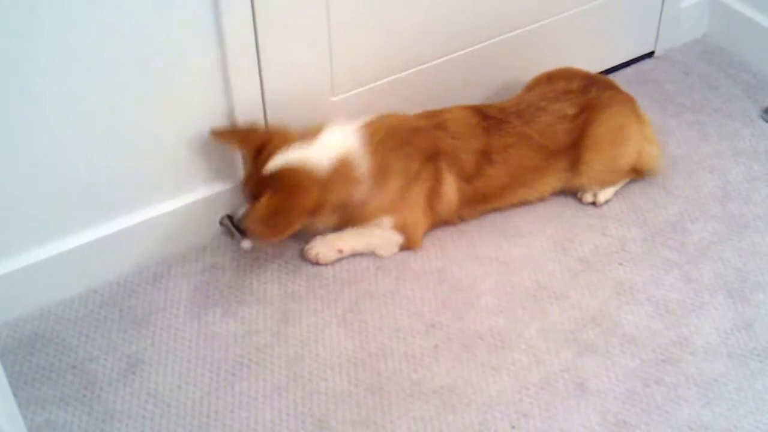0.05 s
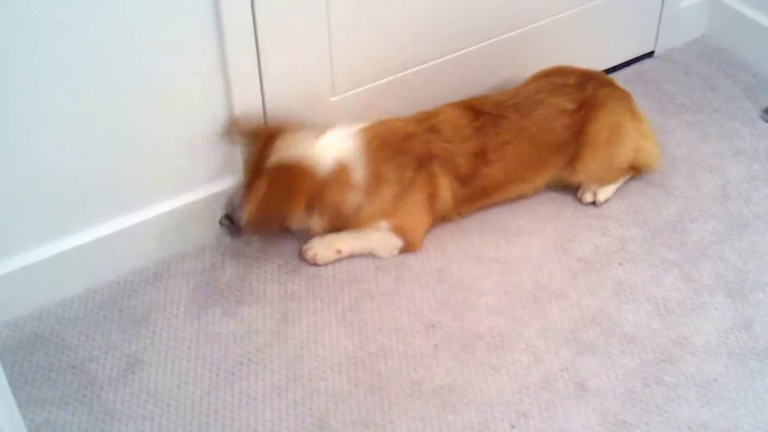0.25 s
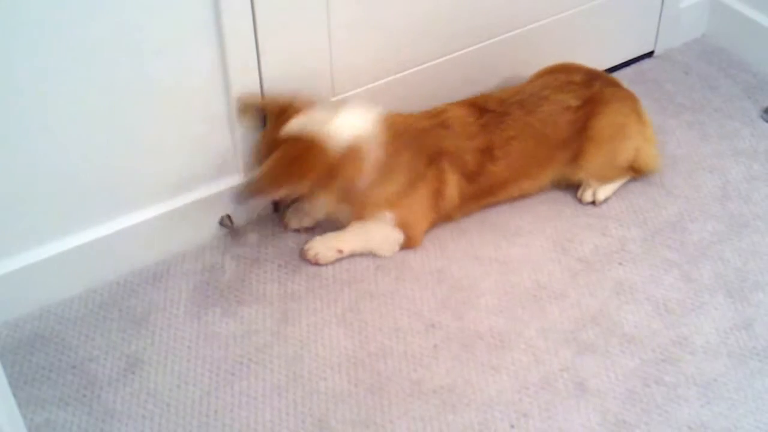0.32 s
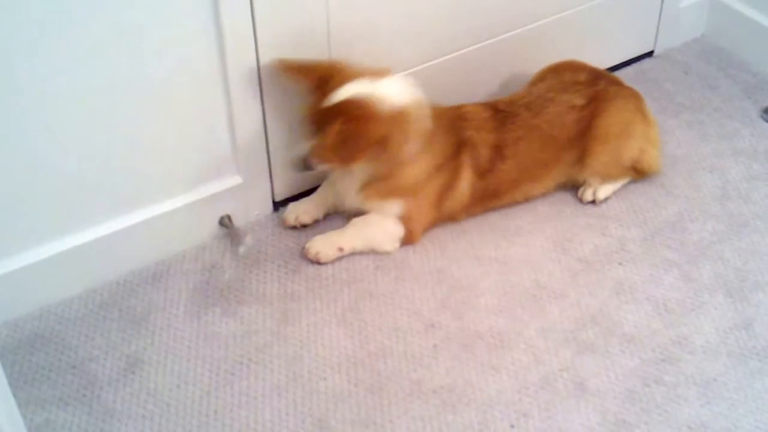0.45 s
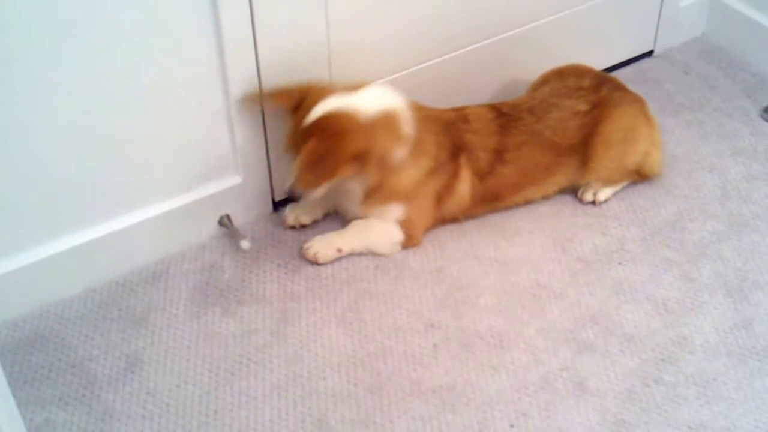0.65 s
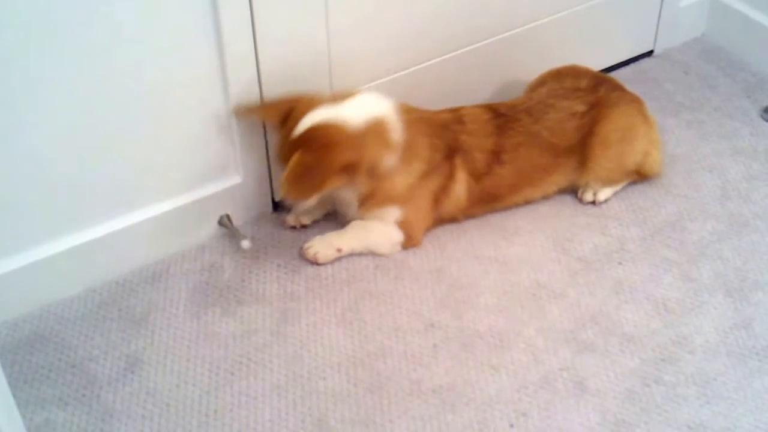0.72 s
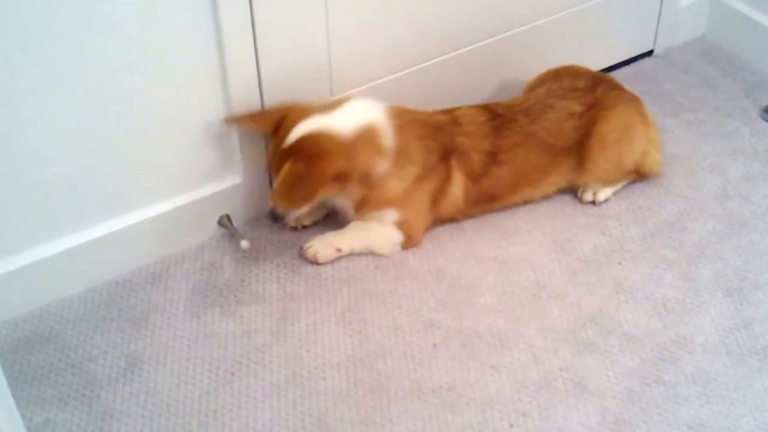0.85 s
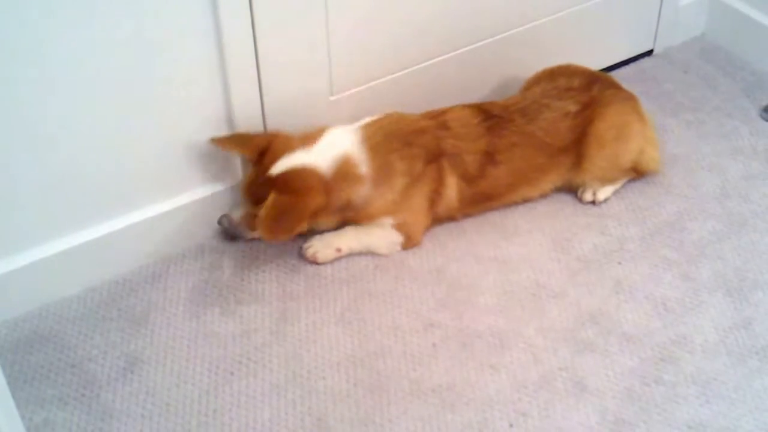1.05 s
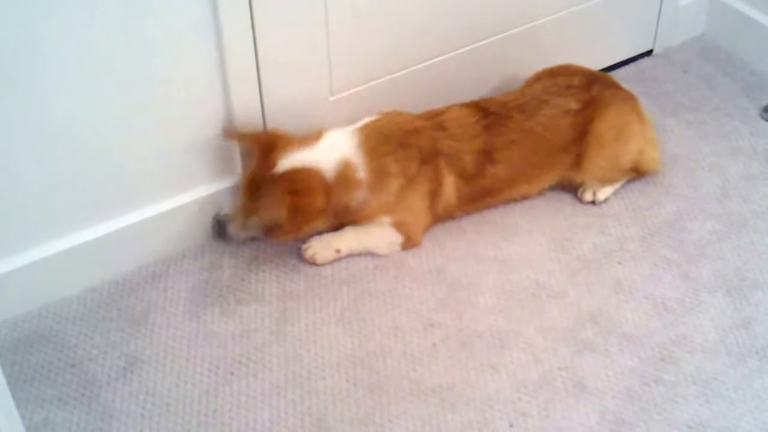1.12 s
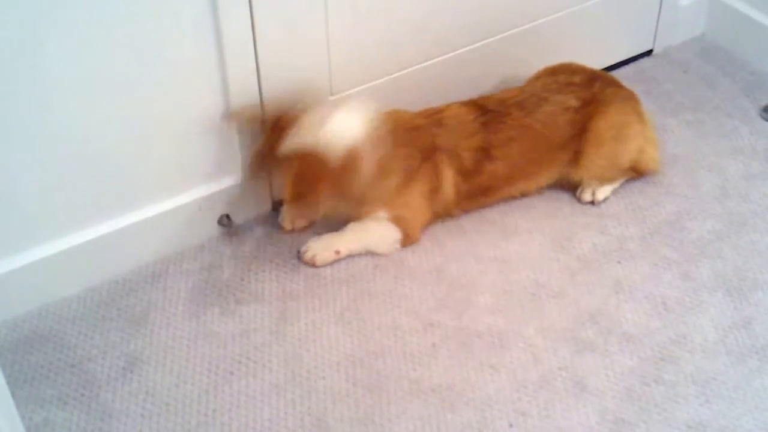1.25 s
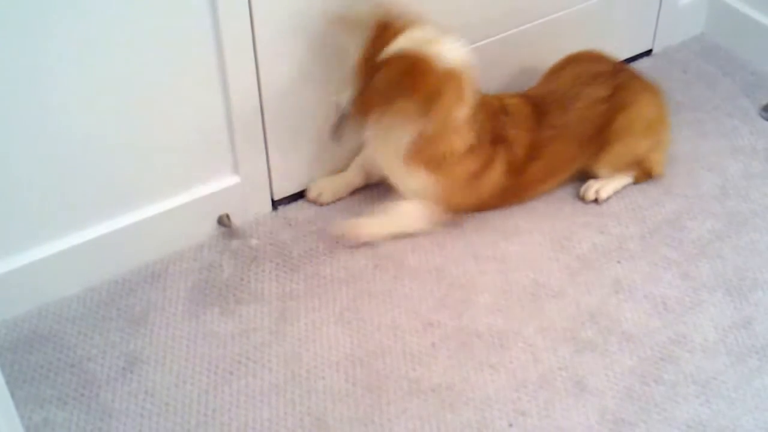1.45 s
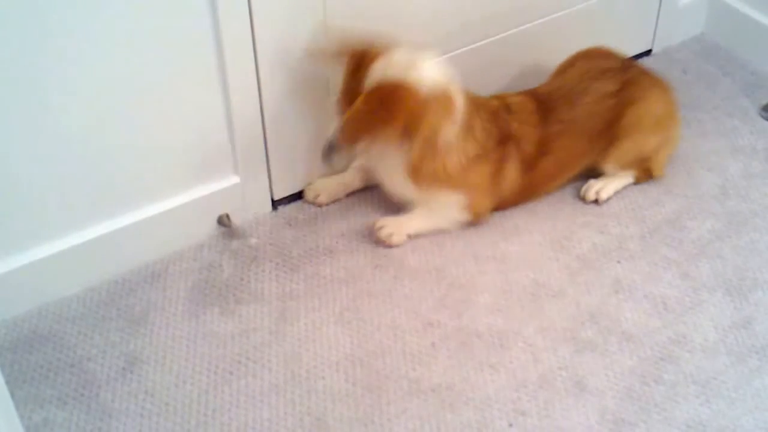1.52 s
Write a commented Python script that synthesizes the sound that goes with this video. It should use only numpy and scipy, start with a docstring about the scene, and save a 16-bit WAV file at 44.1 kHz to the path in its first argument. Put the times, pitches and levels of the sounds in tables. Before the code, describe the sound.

A small dog barks twice, with claws clicking, in an echoing carpeted hallway.

```python
"""A faint click, then a small dog barks twice in a carpeted hallway, which rings on after each bark.
Each bark leaps from a low growl to a nearly pure yelp and drops again: the vocal folds are the source,
throat and mouth the filter, and air hisses past the teeth. Jaws and claws click, the body thuds on
the floor, and fur rustles over the carpet by friction, all above soft room noise."""
import sys
import numpy as np
from scipy import signal
from scipy.fft import rfft, irfft
from scipy.io import wavfile
from scipy.ndimage import uniform_filter1d

SR = 44100
rng = np.random.default_rng(int(sys.argv[2]) if len(sys.argv) > 2 else 0)


def unload_wav(signal):
    """Save mono or channel-first audio to the path in sys.argv[1] as 16-bit WAV at rate SR, clipped to [-1, 1]."""
    wavfile.write(
        sys.argv[1],
        SR,
        np.round(np.clip(np.atleast_2d(signal).T, -1, 1) * 32767).astype(np.int16),
    )


N = 70560
T = np.arange(N) / SR
FFT_SIZE = 2 * N
HZ = np.maximum(np.arange(N + 1) * SR / FFT_SIZE, 1)

# Resonances of throat and mouth: f/Hz, gain/dB
FORMANTS = [(110, -45), (190, -23), (280, 3), (450, 2.5), (680, 10.5), (950, -5.5), (1250, -13),
            (1800, -3.5), (2200, -23.5), (2420, -7), (2700, -23), (3000, -35), (3350, -31.5), (4000, -53)]
# Spectrum of turbulence in the throat: f/Hz, relative level/dB
RASP_SPECTRUM = [(60, -58), (150, -38), (280, -23.5), (600, 1), (1100, -6), (1800, -11), (2200, -7.5),
                 (2420, -10.5), (2700, -10), (3000, -14.5), (3350, -18.5), (4200, -38.5), (13000, -46.5)]
# One contour per bark: t/s, pitch f/Hz, level/dB, overtone gain/dB, relative rasp level/dB
BARK_CONTOURS = [
    [(.204, 250, -35, -6.5, -3), (.220, 301.9, -26.5, 2.5, -19.5), (.227, 419.3, -19, -2, -17),
     (.238, 483.6, -13, 1.5, -14), (.248, 588.3, -14, 5.5, -7), (.270, 708.5, -13, -5, -6.5),
     (.284, 760.3, -11, -16.5, -21), (.304, 756, -18, -14, -21), (.321, 435, -37.5, -23.5, 9),
     (.335, 307.2, -28, -7, -11), (.350, 240, -65.5, -22.5, -16.5)],
    [(1.127, 235.1, -42, 2, -5.5), (1.141, 266.3, -31, 7.5, -8), (1.156, 303.7, -20, 8, -14.5),
     (1.168, 458.6, -16.5, 4, -11.5), (1.195, 476.1, -19, -5.5, 2), (1.205, 678, -12, -5, -10),
     (1.216, 689.6, -18, 10.5, -10), (1.227, 687.4, -14, 5, -11.5), (1.241, 394.3, -32, -18.5, 0.5),
     (1.255, 302.2, -25, 18, -5.5), (1.270, 232, -43, -30.5, -9)],
]
def bark(contour, jitter=0.0049, shimmer_db=4, flutter_hz=72, subtone_db=1, edge_s=.003):
    """Source-filter model: formants shape the harmonics and subharmonics of uneven vocal-fold motion."""
    times, *columns = np.transpose(contour)
    pitch, level_db, overtones_db, rasp_db = [
        uniform_filter1d(np.interp(T, times, column), size=int(edge_s * SR)) for column in columns]
    gate = np.clip(np.minimum(T - times[0], times[-1] - T) / edge_s + 1, 0, 1)
    roughness = from_db(rasp_db - rasp_db.max())
    phase = 2 * np.pi * np.cumsum(pitch * (1 + jitter * roughness * drift(flutter_hz))) / SR
    on, voice, power = gate > 0, np.zeros(N), 0
    for k in np.arange(2, 28) / 2:  # half-integer partials lie between the harmonics
        source_db = overtones_db[on] * (k > 1) + (subtone_db + rasp_db[on]) * (k % 1 > 0)
        gain = from_db(source_db + at_hz(FORMANTS, k * pitch[on]))
        voice[on] += gain * np.sin(k * phase[on])
        power += gain ** 2 / 2
    voice[on] /= np.sqrt(power)
    pulsing = 1 + 0.77 * np.cos(phase)
    rasp = shaped(rng.standard_normal(N) * pulsing, RASP_SPECTRUM)
    shimmer = from_db(shimmer_db * roughness * drift(flutter_hz))
    sound = gate * from_db(level_db) * (voice * shimmer + from_db(rasp_db) * rasp)
    treble_gain = from_db(0.28 * (level_db - level_db.max()))  # brighter when louder
    return highpass(sound, hz=150) + (treble_gain - 1) * highpass(sound, hz=2340)


# Spectrum of air passing the teeth: f/Hz, relative level/dB
HISS_SPECTRUM = [(3000, -21), (4400, -7.5), (5300, -29), (6200, -4.5), (8000, 8.5), (10000, -2.5),
                 (12300, 3.5), (14000, -20.5)]
# Peak of the hiss in each bark: t/s, level/dB
HISS_PEAKS = [(0.272, -48), (1.205, -54.5)]
def teeth_hiss(rise_s=0.029, fall_s=0.02):
    """Turbulent flow past the teeth gives noise that swells and fades at the height of each bark."""
    envelope = sum(from_db(db) * np.exp(-np.where(T < t, ((t - T) / rise_s) ** 2, (T - t) / fall_s))
                   for t, db in HISS_PEAKS)
    return envelope * shaped(rng.standard_normal(N), HISS_SPECTRUM)


# Responses of the dry knock and the bright tick: f/Hz, gain/dB
KNOCK_RESPONSE = [(100, -24.5), (330, 3.5), (550, -9), (850, 3.5), (1600, -2), (2100, -22.5), (2700, -20.5),
                  (4000, -31), (6000, -28.5)]
TICK_RESPONSE = [(1500, -35), (3500, -26), (6500, -18), (9500, -7.5), (11800, 4), (14000, -9.5)]
# Contacts of jaws and claws, before filtering: t/s, knock level/dB, tick level/dB
CONTACTS = [(0.051, -60.5, -33), (0.0984, -17, -17), (.209, -35.5, -29.5), (.379, -9, -35.5),
            (0.412, -22, -46), (0.442, -13, -38), (0.47, -17, -37), (.529, -15.5, -27),
            (0.6932, -11.5, -22), (.8132, -15, -29), (.835, -20, -48), (.877, -26.5, -40.5),
            (0.931, -21.5, -34.5), (.994, -24, -42.5), (1.321, -6, -19), (1.354, -11, -35),
            (1.5288, -21, -15)]
def jaw_and_claw_clicks():
    """Impact excitation: each brief contact is broadband, heard as a knock and a crisp-edged tick."""
    times, knock_db, tick_db = np.transpose(CONTACTS)
    ticks = np.array([bursts(times, tick_db, t60=0.03) for _ in range(2)])
    snaps = bursts(times, tick_db + 2.5, t60=0.0013)
    knocks = bursts(times, knock_db, t60=.007)
    return filtered(knocks, 2 * colour(KNOCK_RESPONSE)), filtered(ticks + snaps, colour(TICK_RESPONSE))


# Impacts of the body on the floor: t/s, excitation level/dB
BODY_IMPACTS = [(0.201, -29), (1.127, -23), (1.286, -16.5), (1.337, -23), (1.541, -39)]
def floor_thuds(resonance_hz=154.6, width_hz=160):
    """Damped resonance: the floor booms briefly under the dog."""
    resonance = 1 / (1 + 1j * (HZ - resonance_hz ** 2 / HZ) / width_hz) ** 2
    return filtered(bursts(*np.transpose(BODY_IMPACTS), t60=0.17), 10 * resonance)


# Reflections from door, walls and ceiling: left delay t/s, right delay t/s, left gain, right gain
EARLY_REFLECTIONS = [(.00305, 0.0036, 0.48, 0.2), (.0068, .0068, 1, 0.79), (.0134, 0.0084, 0.44, 0.18),
                     (.0205, .0204, 0.22, .22), (.0279, .0271, 0.17, 0.26)]
# Narrow room modes, some in close pairs that beat: f/Hz, T60/s, gain/dB
ROOM_MODES = [(470, 0.2, -8), (506, .45, -10), (599, 0.24, -2), (895, .35, -2), (1040, .4, 0),
              (1332, .4, 4), (1490, 0.3, 0), (1645, 0.2, 3), (1937, 0.7, 5), (2058, .35, 7),
              (680, 0.55, -3.5), (690, 0.55, -3.5), (746, 0.64, -3), (758, 0.64, -4.5)]
# Bands of the diffuse field: f/Hz, tail T60/s, gain/dB
DIFFUSE_BANDS = [(125, 0.36, 3.5), (416, 0.41, -5.5), (650, 0.54, -2.5), (1440, 0.46, -8.5),
                 (2980, 0.76, -8), (8000, 0.21, 1.5), (14000, .3, -18)]
def hallway(sound, near_t60=0.19, build_up_s=.011):
    """Reverberation: convolution with early reflections, a decaying diffuse field and room modes."""
    noise, scatter = rfft(diffuse_noise(), FFT_SIZE), 0
    centres, t60s, levels_db = np.transpose(DIFFUSE_BANDS)
    for share, t60, db in zip(np.eye(len(centres)), t60s, levels_db):
        band = irfft(noise * np.interp(np.log(HZ), np.log(centres), share))[:, :N]
        scatter += from_db(db) * band * np.hypot(decay(t60), decay(near_t60))  # tail and close scatter
    scatter *= 1 - np.exp(-(T / build_up_s) ** 2)
    modes = sum(2 * from_db(db) * decay(t60) / decay(t60).sum() * np.sin(2 * np.pi * hz * T)
                for hz, t60, db in ROOM_MODES)
    echoes = sum(row[2:, None] * np.exp(-2j * np.pi * HZ * row[:2, None])
                 for row in np.array(EARLY_REFLECTIONS))
    return filtered(sound, echoes + rfft(scatter + modes, FFT_SIZE))


# Spectrum of fur on carpet: f/Hz, relative level/dB
FUR_SPECTRUM = [(100, -13), (300, 17), (900, -9.5), (2200, 5), (3500, -5), (6800, -12), (10000, -4.5),
                (12500, -6), (14500, 2.5)]
# Strokes of fur: start t/s, duration/s, level/dB
FUR_STROKES = [(-.04, 0.047, -47), (0.321, 0.27, -52.5), (0.62, 0.16, -62), (0.93, 0.15, -68),
               (1.286, 0.12, -45.5), (1.519, 0.061, -48)]
def fur_rustle(grain_db=5.0, grain_hz=120):
    """Friction noise: grainy swishes swell and fade as the dog shifts on the carpet."""
    envelope = sum(from_db(db) * np.sqrt(np.abs(np.sin(np.pi * np.clip((T - t) / duration, 0, 1))))
                   for t, duration, db in FUR_STROKES)
    grain = from_db(grain_db * drift(grain_hz))
    return envelope * grain * shaped(diffuse_noise(), FUR_SPECTRUM)


# Spectrum of the room noise: f/Hz, relative level/dB
AMBIENT_SPECTRUM = [(25, -18), (70, -13.5), (130, -5), (230, -7.5), (350, 8.5), (520, -5), (800, 6.5),
                    (1100, -4.5), (1600, -11), (2500, -16), (3800, -25), (7000, -24), (14000, -20)]
# Envelope of the room noise: t/s, level/dB
AMBIENT_ENVELOPE = [(0, -51), (.13, -48), (.18, -58), (.85, -54), (1.1, -59), (1.6, -49.5)]
def room_noise():
    """Ambient noise floor: a soft diffuse field whose level dips and recovers."""
    envelope = from_db(np.interp(T, *np.transpose(AMBIENT_ENVELOPE)))
    return envelope * shaped(diffuse_noise(), AMBIENT_SPECTRUM)


# Likeness of left and right in the diffuse field: f/Hz, correlation coefficient
CORRELATION = [(50, -2.1), (200, 0.28), (400, 0.72), (700, 0.67), (1300, 1), (3000, 0.83), (6000, 0.98),
               (14000, 0.86)]
def diffuse_noise():
    """Partial coherence: independent mid and side noises mix to set the left-right correlation."""
    alike = np.clip(at_hz(CORRELATION, HZ), -1, 1)
    mid, side = filtered(rng.standard_normal((2, N)), np.sqrt([(1 + alike) / 2, (1 - alike) / 2]))
    return np.array([mid + side, mid - side])


def bursts(times, levels_db, t60):
    """Transient excitation: exponentially decaying noise starts at each time."""
    out, envelope = np.zeros(N), decay(t60)
    for t, db in zip(times, levels_db):
        start = min(int(t * SR), N - 1)
        out[start:] += (from_db(db) * envelope * rng.standard_normal(N))[:N - start]
    return out


def decay(t60):
    """Exponential decay of unit energy, falling 60 dB in t60 seconds."""
    shape = from_db(-60 * T / t60)
    return shape / np.sqrt(np.sum(shape ** 2))


def drift(hz):
    """Random modulation: low-passed noise of unit rms."""
    return unit_rms(filtered(rng.standard_normal(N), 1 / (1 + (HZ / hz) ** 2)))


def shaped(noise, spectrum):
    """Spectral shaping of noise, at unit rms."""
    return unit_rms(filtered(noise, colour(spectrum)))


def colour(points):
    """Minimum-phase response with the given magnitudes, by folding the cepstrum."""
    cepstrum = irfft(np.log(from_db(at_hz(points, HZ))))
    cepstrum[1:N] *= 2
    cepstrum[N + 1:] = 0
    return np.exp(rfft(cepstrum))


def highpass(x, hz):
    """Zero-phase high-pass filter."""
    return filtered(x, 1 / (1 + (hz / HZ) ** 8))


def filtered(x, response):
    """Convolution as a product of spectra."""
    return irfft(rfft(x, FFT_SIZE) * response)[..., :N]


def at_hz(points, hz):
    """Interpolation on a log-frequency axis."""
    frequencies, values = np.transpose(points)
    return np.interp(np.log(hz), np.log(frequencies), values)


def unit_rms(x):
    """Normalisation to rms 1."""
    return x / np.sqrt(np.mean(x ** 2) + 1e-20)


def from_db(db):
    """Decibels to amplitude ratio."""
    return 10 ** (np.asarray(db) / 20)


def scene():
    """Superposition of the dog's direct sound, its reverberation, fur and room noise."""
    knocks, ticks = jaw_and_claw_clicks()
    dog = sum(bark(contour) for contour in BARK_CONTOURS) + teeth_hiss() + knocks + floor_thuds()
    return dog + ticks + hallway(dog + from_db(-16.5) * ticks) + fur_rustle() + room_noise()


# Stereo spread: f/Hz, share of mid power sent to the side at the comb's peaks
SIDE_SHARE = [(2600, 1), (5200, 0.99), (7800, 0.62), (13000, 0.79)]
# Channel balance: f/Hz, left minus right level/dB
CHANNEL_BALANCE = [(60, -2.5), (200, 3), (690, 1), (1270, -2), (2400, 0.5), (4300, -0.5), (8000, -1)]
# Microphone response: f/Hz, gain/dB
MIC_RESPONSE = [(50, -19), (90, -6.5), (130, -2), (14000, -1.5)]
def record(dry, comb_spacing_hz=2586, side_lag_s=.002, cutoff_hz=14250):
    """Mid-side comb filtering widens the image; the microphone colours it and a low-pass cuts the top."""
    mid, side = (dry[0] + dry[1]) / 2, (dry[0] - dry[1]) / 2
    comb = np.cos(np.pi * HZ / comb_spacing_hz) ** 2 * (HZ > comb_spacing_hz / 2)
    spread = np.clip(at_hz(SIDE_SHARE, HZ), 0, 1) * comb
    side = side + filtered(mid, np.sqrt(spread) * np.exp(-2j * np.pi * HZ * side_lag_s))
    mid = filtered(mid, np.sqrt(1 - spread))
    lean = from_db(at_hz(CHANNEL_BALANCE, HZ) / 2)
    response = colour(MIC_RESPONSE) * np.array([lean, 1 / lean])
    heard = filtered(np.array([mid + side, mid - side]), response)
    lowpass = signal.ellip(10, .2, 80, cutoff_hz, fs=SR, output="sos")
    return signal.sosfilt(lowpass, np.clip(heard, -1, 1))


dry = scene()
out = record(dry)
unload_wav(out)
```